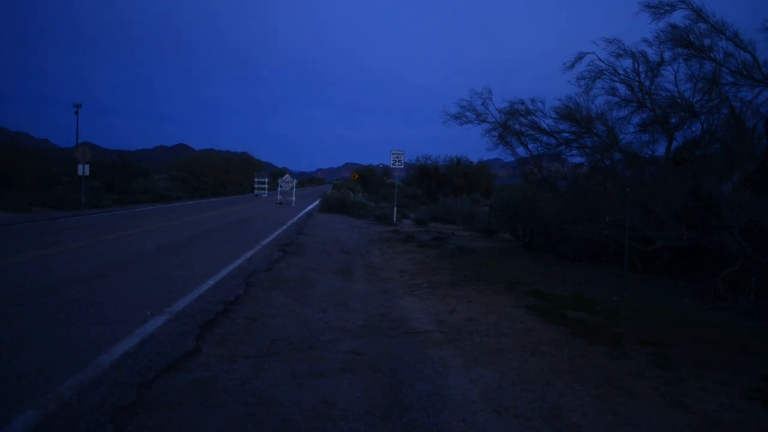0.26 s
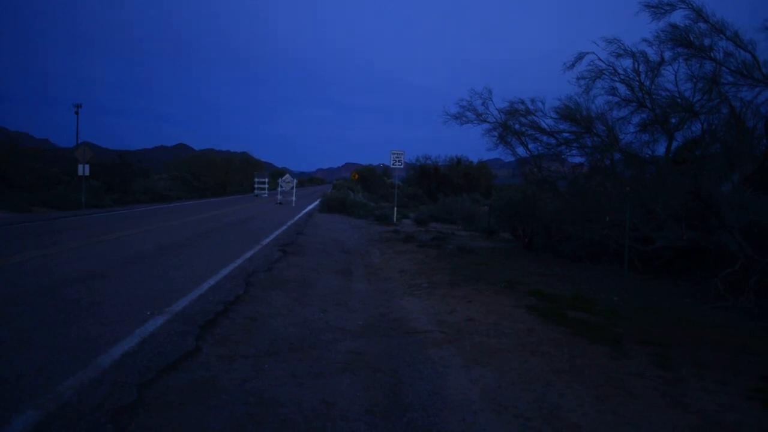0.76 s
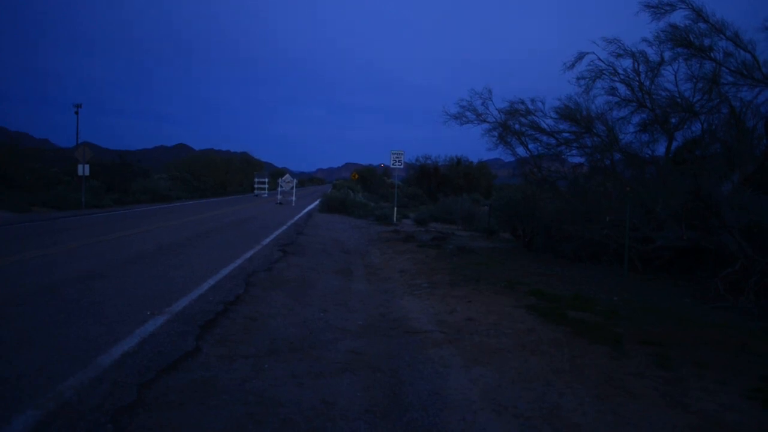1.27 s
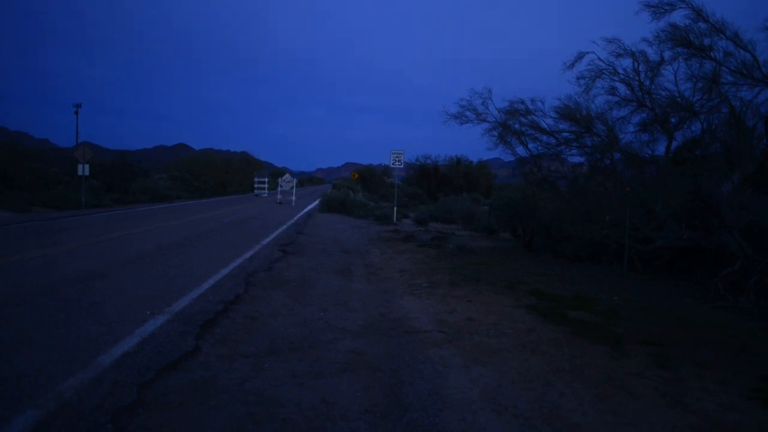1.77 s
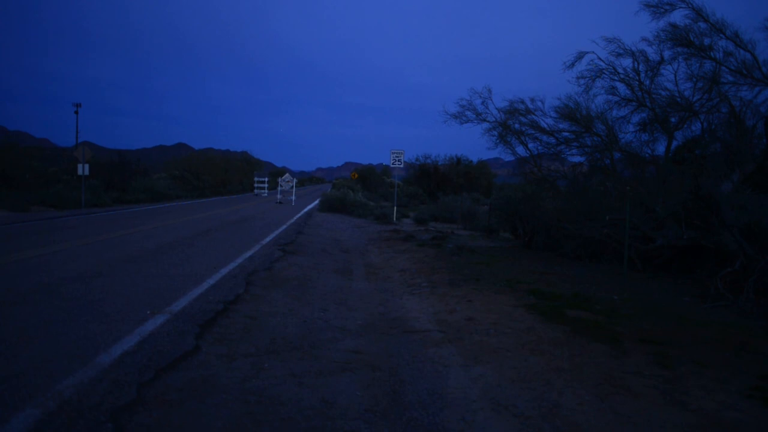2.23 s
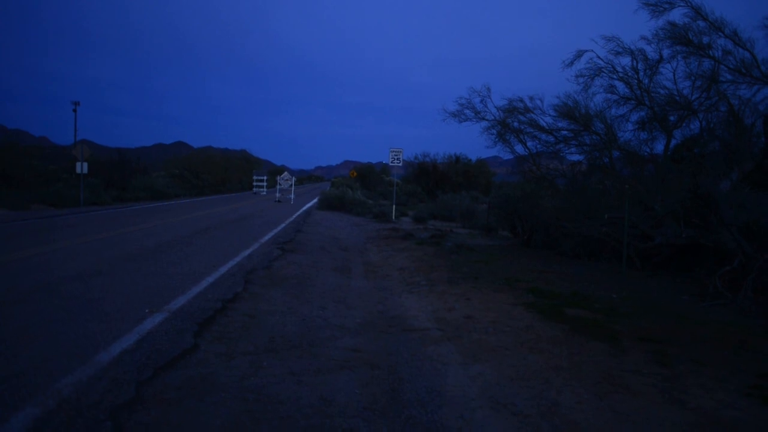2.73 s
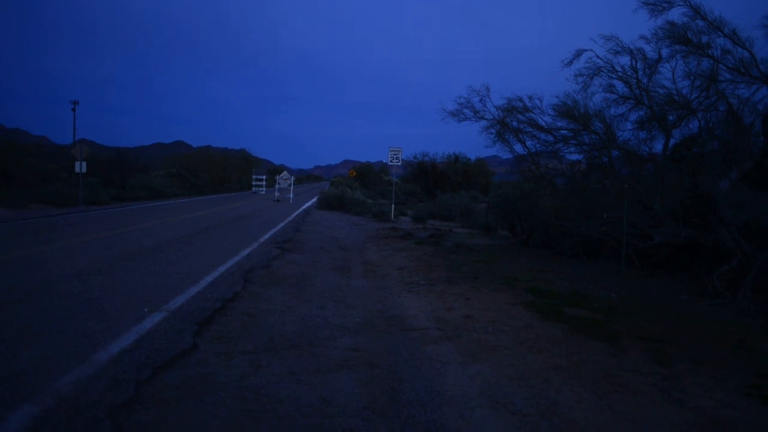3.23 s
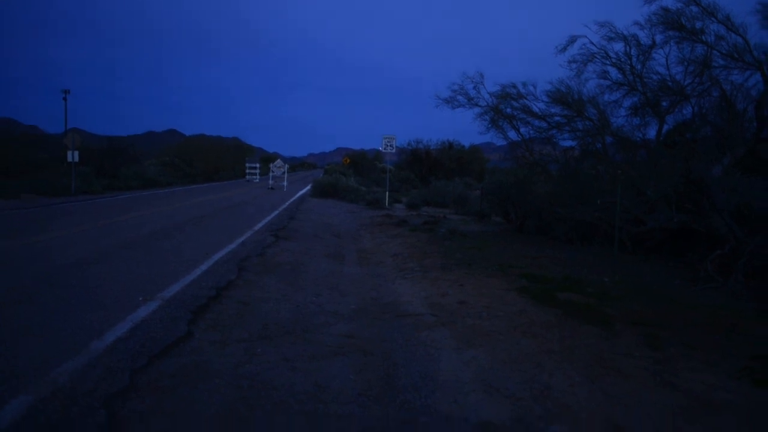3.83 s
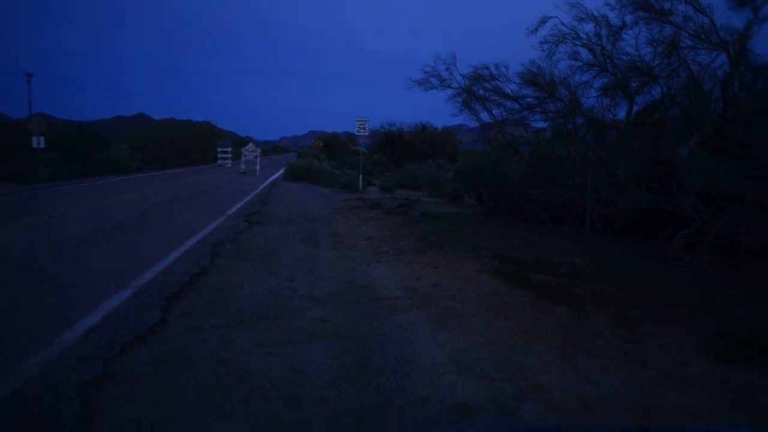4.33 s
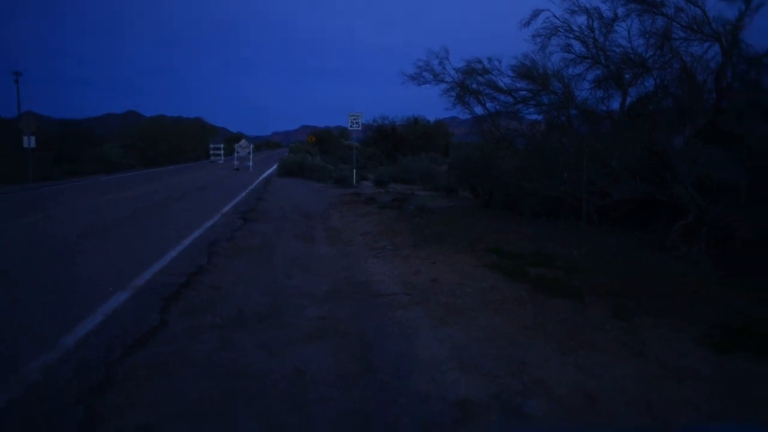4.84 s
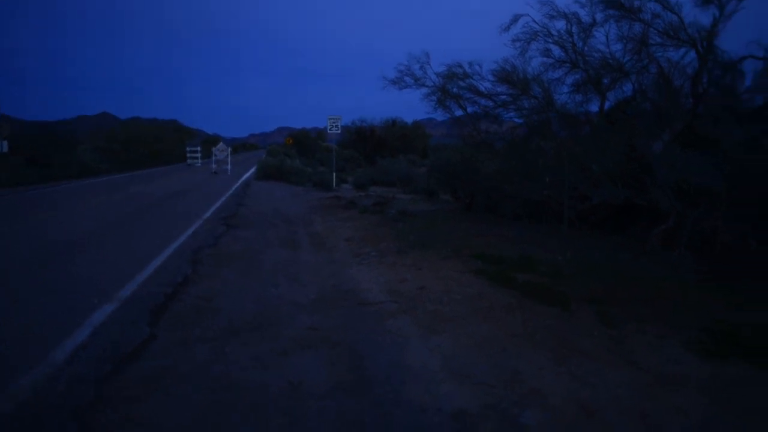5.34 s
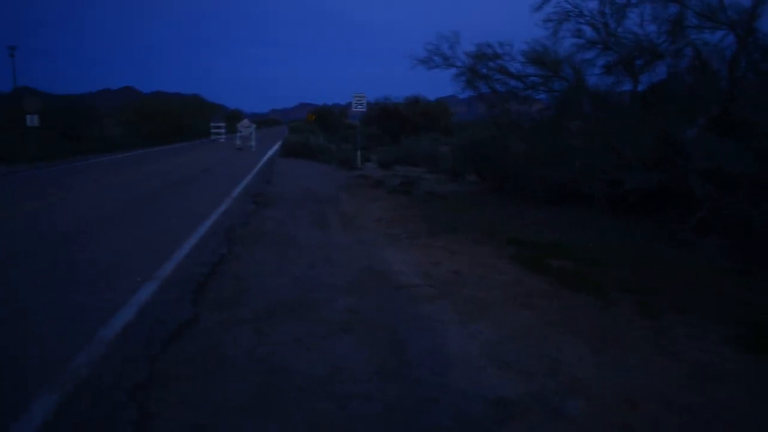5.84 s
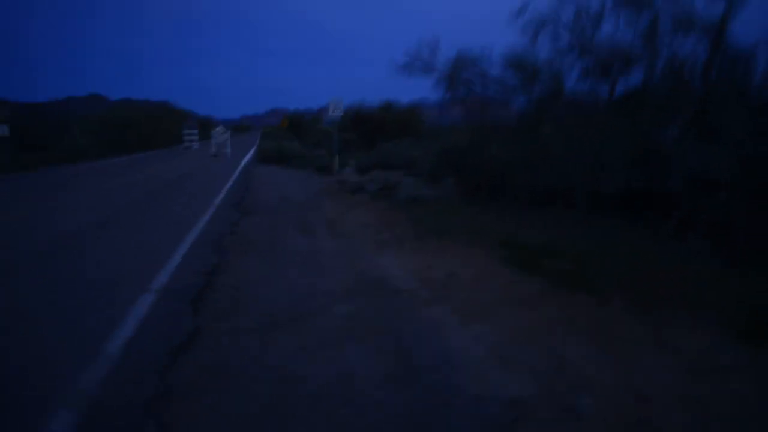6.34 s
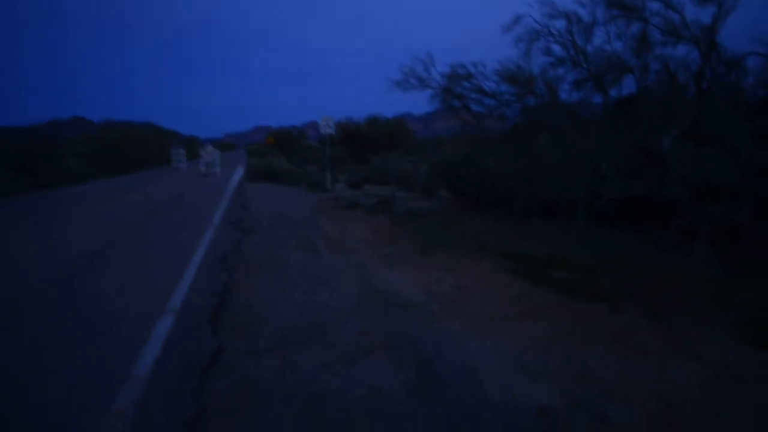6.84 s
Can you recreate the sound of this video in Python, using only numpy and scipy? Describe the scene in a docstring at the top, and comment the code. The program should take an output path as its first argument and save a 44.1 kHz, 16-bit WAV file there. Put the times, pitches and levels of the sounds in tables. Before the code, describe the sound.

The first 1.5 seconds hold only faint evening air, soft low stirrings, hiss and a weak wavering hum. At 1.5 a coyote gives a very soft, brief high whine, then two short, quiet, lower yips at 1.67 and 1.88. At 2.04 the voice breaks abruptly upward into one thin, nearly pure howl, dipping just after its start, fading briefly around 2.4, sagging slightly and dropping at 2.96. Nearby scrub blurs it; a faint hillside echo flutters until about 4. Light finger rubs and tiny clicks begin near 3.3, with stuttering ticks from 4 and a drag at 4.5. A loud crack and thump at 4.86 leads into smaller knocks until 5.4. Sharp plastic clicks follow, strong at 5.35, amid dry rubbing; the loudest snap comes at 6.23 with a bright scrape. Rubbing then fades, leaving hum, air and a small click near 6.9.

```python
"""A coyote beside a desert road at dusk: a soft whine, two yips, then an upward break into one thin howl that
drops at its end. Its voice is a harmonic series weighted by the throat, plus noise pulsed at the pitch.
The scrub and a far hillside answer with clusters of delayed copies. A hand then shifts on the camera: the mount
knocks (noise bursts, dispersed twang), the housing clicks (decaying modes), fingers rub (stick-slip noise).
A faint hum of wavering sines, stirring air and hiss lie underneath."""
import sys
import numpy as np
from scipy import signal
from scipy.fft import rfft, irfft, next_fast_len
from scipy.io import wavfile
from scipy.ndimage import uniform_filter1d, map_coordinates

SR = 44100
rng = np.random.default_rng(int(sys.argv[2]) if len(sys.argv) > 2 else 0)


def dump_mix(stems):
    """Bounce the given channels to the path in sys.argv[1] as a 16-bit WAV at rate SR."""
    frames = np.atleast_2d(stems).T  # one column per channel
    limited = np.clip(frames, -1, 1)  # hard clip at full scale
    pcm = np.round(limited * 32767).astype(np.int16)
    wavfile.write(sys.argv[1], SR, pcm)


N = 312943


# Transfer function of throat and mouth: f/Hz, level/dB
THROAT = [(500, -18.5), (700, -6.5), (900, -21), (1100, -2), (1380, 0), (1550, -5.5), (1750, -18),
          (2000, -21.5), (2390, -22.5), (2750, -35), (3450, -59.5), (4200, -38), (4600, -53.5),
          (5500, -55.5), (7000, -92)]
# Spectrum of the rasp: f/Hz, level/dB
RASP_SPECTRUM = [(350, -29.5), (600, -10.5), (900, -5.5), (1250, 3.5), (1700, -5.5), (2100, -11.5),
                 (2450, -16), (2950, -19.5), (3600, -29), (7000, -42.5)]
# A soft whine and two yips: t/s, length/s, start f/Hz, top f/Hz, end f/Hz, level/dB, rasp re tone/dB
YIPS = [(1.505, .13, 1185, 1209, 1160, -50, -15), (1.669, .078, 548, 668.7, 625, -28, -22.5),
        (1.875, .115, 566.7, 697, 636, -30, -31)]
# Gliding roughens the voice: the speed that doubles the rasp, and the most it adds
RASP_OCTAVES_PER_S, RASP_MOST_DB = 3, 20


def coyote(yip_jitter=0.00907, howl_jitter=0.00096, shimmer_db=1.5, count=7):
    """Source-filter principle: harmonics of the folds pass the throat, rough when low or gliding, else pure."""
    calls = [yip(*row) for row in YIPS] + [howl()]
    pitches, levels, rasps_db = np.stack(calls, axis=1)
    # one throat: the strongest call sets the pitch
    strongest = levels.argmax(axis=0), np.arange(N)
    pitch, effort_db = pitches[strongest], levels[strongest]
    low_register = np.clip((1100 - pitch) / 400, 0, 1)
    glide = np.abs(np.gradient(np.log2(pitch))) * SR  # octaves per second
    roughening = np.minimum(1 + (glide / RASP_OCTAVES_PER_S) ** 2, amp(RASP_MOST_DB))
    harshness = amp(rasps_db[strongest]) * roughening
    pitch = pitch * (1 + (howl_jitter + yip_jitter * low_register) * wobble(170))
    phase = 2 * np.pi * np.cumsum(pitch) / SR
    tone = np.zeros(N)
    for k in range(1, count + 1):
        # the overtones waver more than the fundamental
        shimmer = shimmer_db * min(k - .7, 1.5) * wobble(21.95)
        tone += np.sqrt(2) * amp(along(THROAT, k * pitch) + shimmer) * np.sin(k * phase)
    # air escapes in one puff a cycle
    breath = coloured(rng.standard_normal(N), RASP_SPECTRUM)
    rasp = unit(breath * (2 + np.cos(phase)))
    return amp(effort_db) * (tone + harshness * rasp)


# The pitch arch, before smoothing, peaks this long after the start; the smoothing window
YIP_TOP_S, YIP_ROUND_S = .056, 0.015
# Every yip starts sharply and weakens (attack and release are times for 20 dB)
YIP_ATTACK_S, YIP_RELEASE_S, YIP_SAG_DB_PER_S = .015, .022, 25


def yip(s, length, start_hz, top_hz, end_hz, db, rasp_db):
    """Frequency and amplitude modulation: pitch, level and rasp of one short arching call."""
    arch = curve([(s, start_hz), (s + min(YIP_TOP_S, length), top_hz), (s + length, end_hz)])
    pitch = uniform_filter1d(arch, int(YIP_ROUND_S * SR))
    level = db + envelope(s, length, YIP_ATTACK_S, YIP_RELEASE_S, YIP_SAG_DB_PER_S)
    return pitch, level, np.full(N, rasp_db)


# The voice breaks into the high register and drops back; the time constants of both
BREAK_S, DROP_S, BREAK_TAKES_S, DROP_TAKES_S = 2.044, 2.96, .002, .012
# High note at the break and its sag; low register, with a scoop centred on the break
HOWL_HZ, SAG_HZ_PER_S = 1191, 80
LOW_HZ, SCOOP_HZ, SCOOP_S = 641, 110, .016
# Level, and the times in which it rises by 20 dB, holds and falls by 20 dB
HOWL_DB, HOWL_ATTACK_S, HOWL_HOLD_S, HOWL_RELEASE_S = -21, 0.033, 0.91, 0.033
# Strength lost over the hold, mostly at its very end
TIRING_DB, TIRING_POWER = 5, 7.5
# Rasp relative to the tone in each register
LOW_RASP_DB, HIGH_RASP_DB = -33, -43.5
# After a dip both pitch and level overshoot by this share of it, this long after it
REBOUND_SHARE, REBOUND_AFTER_S = .11, .078
# Dips of the high note, the first in pitch and level, the second a brief fade:
# t/s, half width/s, pitch dip f/Hz, level dip/dB
DIPS = [(2.111, .022, 123.5, 9.5), (2.434, 0.035, -0.5, 9)]


def howl(wander=.002):
    """Register transition: pitch, level and rasp cross from low to a sagging high note and back."""
    t = np.arange(N) / SR
    age = t - BREAK_S
    high = (1 + np.tanh(age / BREAK_TAKES_S)) * (1 - np.tanh((t - DROP_S) / DROP_TAKES_S)) / 4
    low_hz = LOW_HZ + SCOOP_HZ * np.exp(-np.abs(age) / SCOOP_S)
    high_hz = (HOWL_HZ - SAG_HZ_PER_S * age) * (1 + wander * wobble(14))
    level = HOWL_DB + envelope(BREAK_S, HOWL_HOLD_S, HOWL_ATTACK_S, HOWL_RELEASE_S)
    level = level - TIRING_DB * np.clip(age / HOWL_HOLD_S, 0, 1) ** TIRING_POWER
    for s, width, dip_hz, dip_db in DIPS:
        dip = np.exp(-((t - s) / width) ** 2)
        rebound = REBOUND_SHARE * np.exp(-((t - s - REBOUND_AFTER_S) / width) ** 2)
        high_hz = high_hz - dip_hz * (dip - rebound)
        level = level - dip_db * (dip - rebound)
    pitch = low_hz + high * (high_hz - low_hz)
    rasp_db = LOW_RASP_DB + high * (HIGH_RASP_DB - LOW_RASP_DB)
    return pitch, level, rasp_db


# Echoes from banks and hills: delay t/s, spread/s, level re call/dB, fullness of the echo (0-1)
ECHOES = [(0.013, 0.024, -12, 0.4), (.085, .06, -18, 1), (.19, .12, -20, 0.96), (1.19, .1, -30.5, 0),
          (1.24, .08, -30.5, 0.01)]
# Full echoes are stronger near 700 and 2000 Hz: f/Hz, level/dB
FULL_ECHO_SPECTRUM = [(400, -2), (700, 8.5), (1100, -3), (1400, -8.5), (1800, 7), (2300, 4.5), (3500, -3)]
# Echoes swell and fade as the air shifts: t/s, level per second of path/(dB/s)
CARRY = [(3.25, -1), (3.65, 3), (4.1, -7.5)]


def landscape(call, absorb_db=14, count=24):
    """Diffuse reflection: each slope returns a cluster of weak copies; air absorbs the highs of long paths."""
    answer = np.zeros(N)
    for delay, spread, db, fullness in ECHOES:
        slope = np.zeros(SR)
        lag = rng.exponential(spread, count).clip(0, .9)
        slope[(lag * SR).astype(int)] = rng.standard_normal(count) * np.exp(-lag / spread)
        slope[0] = 3

        def path(hz):
            absorbed = absorb_db * delay * (hz / 2300) ** 2
            return amp(fullness * along(FULL_ECHO_SPECTRUM, hz) - absorbed)

        echo = filtered(signal.fftconvolve(call, slope)[:N], path)
        # moving air makes the long paths flutter
        carry_db = curve(np.subtract(CARRY, (delay, 0))) + 2.5 * wobble(22.01)
        add(answer, delay, amp(db) * np.std(call) * unit(echo * amp(delay * carry_db)))
    return answer


# Spectrum of the crack: f/Hz, level/dB
CRACK = [(80, -33), (300, -13), (1000, -1.5), (2000, -6.5), (3000, -5), (4200, 0.5), (5550, -0.5),
         (6300, -15.5), (8000, -24.5), (10000, -36), (15000, -46)]
# Spectrum of the thump: f/Hz, level/dB
THUMP = [(50, -55), (130, -45), (190, -13), (260, 13), (340, 1), (500, -17), (1200, -68), (5000, -90)]
# Spectrum of the camera body, in twangs and shuffles: f/Hz, level/dB
BODY = [(60, -57), (140, -36.5), (220, -2), (400, 1.5), (650, 1), (1100, -8.5), (1800, -15), (4000, -19),
        (9000, -84)]
# Jerks of the mount: t/s, crack level/dB, crack t60/s, thump level/dB, twang level/dB
KNOCKS = [(4.860, -4.5, 0.017, -18.5, -16), (4.903, -23, 0.063, -22, -18), (4.991, -22, 0.074, -23, -20.5),
          (5.067, -19, 0.045, -21.5, -21), (5.121, -22.5, 0.056, -27.5, -20),
          (5.163, -22.5, 0.045, -25.5, -25.5), (5.217, -19, 0.037, -30, -25),
          (5.412, -21.5, 0.047, -46, -44)]


def mount(lag_cycles=14, twang_t60=0.12, thump_t60=0.089, count=3):
    """Bending-wave dispersion: after crack and thump the highs arrive first, so a short twang falls."""
    out = np.zeros(N)
    for s, crack_db, length, thump_db, twang_db in KNOCKS:
        crack = amp(crack_db) * burst(CRACK, length)
        thump = amp(thump_db) * burst(THUMP, thump_t60, attack=0.0053)
        add(out, s, crack + thump)
        # paths of different length blur the twang
        for lag in lag_cycles * rng.uniform(.5, 1.5, count):
            def bend(hz):
                dispersion = np.exp(-2j * np.pi * lag * np.log(hz + 60))
                return dispersion * hz ** 4 / (hz ** 4 + 380 ** 4)

            twang = filtered(burst(BODY, twang_t60), bend)
            add(out, s, amp(twang_db) / np.sqrt(count) * twang)
    return out


# Sharp clicks of the housing: t/s, level/dB, dull body re level/dB
CLICKS = [(3.492, -39, -9), (5.31, -25, -13), (5.3491, -7, -11), (5.3776, -24, -2.5), (5.4135, -24.5, 12.5),
          (5.584, -23.5, 1), (5.688, -32.5, 4.5), (5.8597, -27, -30), (5.8782, -16, -33),
          (6.0308, -26, -30), (6.064, -17.5, -19), (6.228, 6.5, -29.5), (6.433, -44.5, 12),
          (6.888, -24.5, -24)]
# Modes of the housing, before random detuning: f/Hz, level/dB, t60/s
RING = [(3418, -1.5, 0.011), (3795, 3.5, 0.0051), (3040, -44, 0.011), (5120, -7, 0.0031)]
# Spectrum of a snap or bright scrape: f/Hz, level/dB
SNAP = [(200, -29), (1500, -28), (3500, 0), (5500, 6.5), (8000, -13.5), (15000, -26)]
# Spectrum of the housing under pressure, in click bodies and drags: f/Hz, level/dB
PRESSED = [(100, -34), (250, -14.5), (650, -5), (900, 0.5), (1200, 4), (1850, -6.5), (2400, -1),
           (3000, -13), (3600, -9.5), (5300, -11.5), (6500, -33.5), (8000, -36.5), (11000, -46.5),
           (16000, -53.5)]


def clicks(snap_db=-9, attack=0.00019, detune=0.06):
    """Modal excitation: an impulse snaps the housing and its modes ring for a few milliseconds."""
    out, t = np.zeros(N), np.arange(SR // 4) / SR
    for s, db, body_db in CLICKS + stutters() + ticks():
        ring = np.zeros(len(t))
        for hz, level, t60 in RING:
            strength = amp(level + rng.normal(0, 2.5))
            decay = np.exp(-np.log(1000) * t / t60)
            ring += strength * decay * np.sin(2 * np.pi * hz * rng.normal(1, detune) * t)
        ring *= 1 - np.exp(-(t / attack) ** 2)
        snap = amp(snap_db) * burst(SNAP, t60=0.0045)
        body = amp(body_db) * burst(PRESSED, t60=0.021)
        add(out, s, amp(db) * (ring + snap + body))
    return out


STUTTER_GAP_S, STUTTER_SLOWING, STUTTER_LOSS_DB = .011, 1.3, 2.5
# A fingertip stutters in a run of clicks: t/s, first level/dB, dull body re level/dB
STUTTERS = [(3.99, -28, -8.5), (4.319, -27.5, -10.5), (4.738, -36.5, 3), (4.8, -30, -4.5)]


def stutters(count=3):
    """Stick-slip relaxation: each stutter is a run of clicks that weakens and slows."""
    return [(s + STUTTER_GAP_S * k ** STUTTER_SLOWING, db - k * STUTTER_LOSS_DB, body_db)
            for s, db, body_db in STUTTERS for k in range(count)]


TICKS_FROM_S, TICK_DB, TICK_SCATTER_DB, TICK_BODY_DB = 3.7, -39, 3.5, -5


def ticks(count=12):
    """Random point process: faint clicks at independent moments of the handling."""
    return [(rng.uniform(TICKS_FROM_S, N / SR), rng.normal(TICK_DB, TICK_SCATTER_DB), TICK_BODY_DB)
            for _ in range(count)]


# Spectrum of the lightly touched shell: f/Hz, level/dB
SHELL = [(200, -37), (600, -29), (1150, -29), (1900, -22.5), (2300, -16.5), (2600, -7.5), (3500, 2.5),
         (4000, 1), (4500, -8), (5600, -10.5), (6500, -19.5), (8000, -30), (10000, -41), (15000, -58)]
# Light strokes of the fingers: peak t/s, level/dB, rise per 20 dB/s, fall per 20 dB/s
RUBS = [(3.33, -52, 0.11, .08), (3.44, -52, .08, 0.068), (4.31, -49.5, .25, 0.17), (4.565, -33, 0.064, .11),
        (5.34, -35.5, 0.21, .08), (5.45, -25.5, 0.09, 0.47), (5.862, -31.5, 0.042, 0.039),
        (5.972, -27, .08, 0.07), (6.07, -28.5, 0.035, 0.21), (6.295, -21.5, 0.23, 0.077),
        (6.64, -47, 0.071, 0.25)]
# Fingers dragging with pressure: t/s, length/s, level/dB
DRAGS = [(4.53, 0.12, -25.5), (4.8, 0.037, -45.5), (5.415, 0.078, -30.5), (5.522, 0.25, -42)]
# The camera body shuffling in the grip: peak t/s, level/dB, rise per 20 dB/s, fall per 20 dB/s
SHUFFLES = [(4.48, -43, 0.31, 0.28), (4.69, -40, 0.28, 0.11), (4.94, -28.5, 0.11, 0.13),
            (5.23, -31, .55, 0.2), (5.42, -31, 0.014, 0.087)]
# A drag bites at once, eases and lets go (bite and release are times for 20 dB)
DRAG_BITE_S, DRAG_RELEASE_S, DRAG_SAG_DB_PER_S = 0.0085, 0.036, 39
# The grip tightens (20 dB per rise time) and stays, with a little of each friction
GRIP_S, GRIP_RISE_S, GRIP_RUB_DB, GRIP_DRAG_DB, GRIP_SHUFFLE_DB = 4.34, 1.2, -55.5, -54.5, -61
# A hard stroke scrapes brightly: its level at this rub level, falling twice as fast in dB below it
SCRAPE_DB, SCRAPE_AT_DB = -36.5, -22.5


def hand():
    """Friction-driven resonance: a light touch sings in the shell, pressure brings in the lower body."""
    grip = envelope(GRIP_S, N / SR, GRIP_RISE_S, 1)

    def with_grip(power, db):
        return np.sqrt(power + amp(db + grip) ** 2)

    rub_power = swells(RUBS)
    drag_power = np.zeros(N)
    for s, length, db in DRAGS:
        drag_db = db + envelope(s, length, DRAG_BITE_S, DRAG_RELEASE_S, DRAG_SAG_DB_PER_S)
        drag_power += amp(drag_db) ** 2
    rub = with_grip(rub_power, GRIP_RUB_DB) * friction(
        SHELL, slips_per_s=900, smooth_share=1.8, flutter_db=1.7, patchy_db=2.5)
    drag = with_grip(drag_power, GRIP_DRAG_DB) * friction(
        PRESSED, slips_per_s=1100, smooth_share=0.93, flutter_db=2.5, patchy_db=1.5)
    shuffle = with_grip(swells(SHUFFLES), GRIP_SHUFFLE_DB) * friction(
        BODY, slips_per_s=500, smooth_share=0.97, flutter_db=1.0, patchy_db=3.0)
    scrape = amp(SCRAPE_DB) * rub_power / amp(SCRAPE_AT_DB) ** 2 * friction(
        SNAP, slips_per_s=700, smooth_share=.6, flutter_db=0, patchy_db=2)
    return rub + scrape + drag + shuffle


def friction(spectrum, slips_per_s, smooth_share, flutter_db, patchy_db):
    """Stick-slip: skin on plastic gives tiny impulses over smooth hiss, recoloured as the contact moves."""
    slips = unit((rng.random(N) < slips_per_s / SR) * rng.standard_normal(N))
    grain = slips + smooth_share * rng.standard_normal(N)
    fluttering = grain * amp(flutter_db * wobble(90))
    return coloured(patchy(fluttering, patchy_db), spectrum)


# Hum and a faint high whine, before the swell: f/Hz, level/dB, half the rate of the phase wobble/Hz
HUM = [(53.6, -69, 7), (96.5, -63.5, 3), (141.4, -60, 0.75), (277, -70, 2), (3930, -75.5, 40),
       (4250, -77, 62), (4980, -78.5, 20)]
# Gain of hum and whine: t/s, level/dB
HUM_SWELL = [(0, -4), (3, 2), (4.5, 4), (7.1, 3.5)]
# Spectrum of the air: f/Hz, level/dB
AIR = [(15, -21.5), (40, -3.5), (110, -1.5), (170, -3), (250, -4), (420, -6.5), (680, -5.5), (1200, -13),
       (2600, -17.5), (4500, -17.5), (6000, -22), (8000, -26.5), (15000, -39)]
# Level of the air: t/s, level/dB
AIR_LEVEL = [(0, -55), (3, -55), (4.5, -52.5), (7.1, -53)]
# Soft low stirrings in the air: peak t/s, level/dB
STIRS = [(.72, -52), (1.16, -52), (1.488, -52.5)]
STIR_RISE_S, STIR_FALL_S = .14, 0.15  # times for 20 dB


def background(hiss_db=-62, drift_db=1):
    """Shaped noise and phase-modulated tones: stirring evening air, microphone hiss, a low wavering hum."""
    t = np.arange(N) / SR
    hum = np.zeros(N)
    for hz, db, width in HUM:
        hum += amp(db) * np.sqrt(2) * np.sin(2 * np.pi * hz * t + 0.81 * wobble(2 * width))
    air = amp(curve(AIR_LEVEL)) * coloured(patchy(rng.standard_normal(N), drift_db), AIR)
    stirring = np.sqrt(swells([(s, db, STIR_RISE_S, STIR_FALL_S) for s, db in STIRS]))
    stir_spectrum = [(30, -11.0), (120, -5), (220, -1.0), (400, -13.5), (2000, -50.5)]
    stir = stirring * coloured(rng.standard_normal(N), stir_spectrum)
    hiss = amp(hiss_db) * coloured(rng.standard_normal(N), [(6000, -8.5), (16000, -9.5)])
    return amp(curve(HUM_SWELL)) * hum + air + stir + hiss


def amp(db):
    """Level law: decibels to amplitude gain."""
    return 10 ** (np.asarray(db) / 20)


def unit(x):
    """Normalisation: x at rms 1."""
    return x / np.sqrt(np.mean(x ** 2) + 1e-20)


def along(points, hz):
    """Logarithmic frequency scale: (Hz, value) points read at hz."""
    f, v = np.transpose(points)
    return np.interp(np.log(hz + 1), np.log(f + 1), v)


def curve(rows):
    """Linear interpolation: (s, value) rows as one value per sample."""
    return np.interp(np.arange(N) / SR, *np.transpose(rows))


def wobble(rate, size=32):
    """Band-limited random modulation: a smooth curve through rate knots a second."""
    steps = np.arange(0, N + size, size)
    knots = rng.standard_normal(int(N * rate / SR) + 4)
    return np.interp(np.arange(N), steps, map_coordinates(knots, [steps * rate / SR]))


def filtered(x, response):
    """Linear filtering: the spectrum of x times a complex response of frequency."""
    m = next_fast_len(len(x) + SR // 4)
    return irfft(rfft(x, m) * response(np.fft.rfftfreq(m, 1 / SR)), m)[:len(x)]


def coloured(x, spectrum):
    """Spectral shaping: x weighted by a spectrum, at rms 1."""
    return unit(filtered(x, lambda hz: amp(along(spectrum, hz))))


def burst(spectrum, t60, attack=0.00032):
    """Exponential decay: a puff of coloured noise that rises quickly and dies away."""
    t = np.arange(SR // 4) / SR
    fade = np.exp(-np.log(1000) * t / t60)
    noise = coloured(rng.standard_normal(len(t)), spectrum)
    puff = noise * fade * (1 - np.exp(-(t / attack) ** 2))
    return puff * np.linalg.norm(fade) / np.linalg.norm(puff)


def add(track, s, sound):
    """Superposition: mix a sound into a track at s seconds."""
    part = track[round(s * SR):][:len(sound)]
    part += sound[:len(part)]


def patchy(x, depth_db):
    """Time-frequency modulation: x with fleeting peaks and hollows in its spectrum."""
    z = signal.stft(x, nperseg=512)[2]
    field = uniform_filter1d(rng.standard_normal(z.shape), size=4, axis=0)
    field = uniform_filter1d(field, size=8, axis=1)
    return unit(signal.istft(z * amp(depth_db * unit(field)), nperseg=512)[1][:len(x)])


def envelope(s, hold, rise, fall, sag_db=0):
    """Exponential envelope in dB: rise up to s, hold sagging sag_db a second, fall; rise and fall per 20 dB."""
    t = np.arange(N) / SR - s
    slopes = np.minimum(t, 0) / rise - np.maximum(t - hold, 0) / fall
    return np.maximum(20 * slopes - sag_db * np.clip(t, 0, hold), -200)


def swells(rows):
    """Addition of powers: swells that rise to a peak and fall, rows of (s, dB, rise s, fall s)."""
    return sum(amp(db + envelope(s, 0, rise, fall)) ** 2 for s, db, rise, fall in rows)


def scene():
    """Superposition: the coyote in its landscape, with the handling close by."""
    call = coyote()
    handling = mount() + clicks() + hand()
    return (call + landscape(call) + handling + background())[None]


TOP_HZ = 15830  # middle of the band limit's slope


def record(dry):
    """Saturation and band limiting: peaks clip at full scale, then a low-pass removes the top."""
    clipped = np.clip(dry[0], -1, 1)
    return filtered(clipped, lambda hz: np.clip((TOP_HZ - hz) / 400 + .5, 0, 1))[None]


dry = scene()
out = record(dry)
dump_mix(out)
```